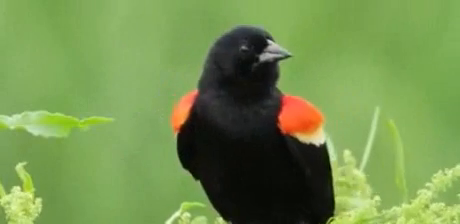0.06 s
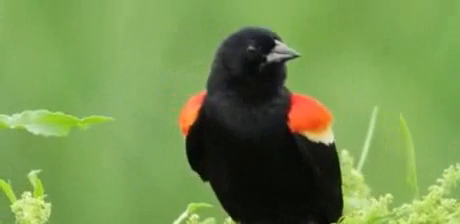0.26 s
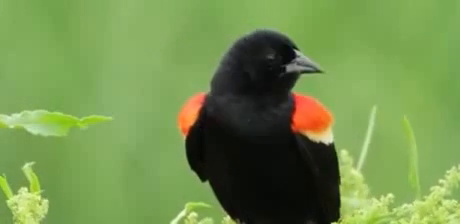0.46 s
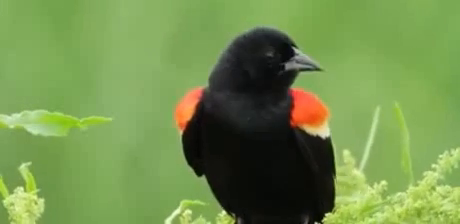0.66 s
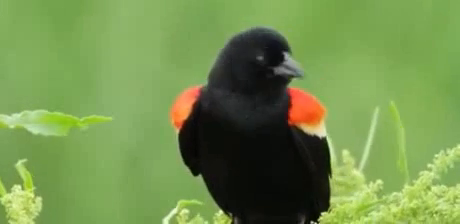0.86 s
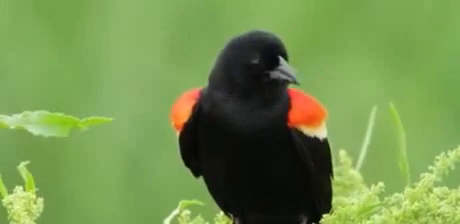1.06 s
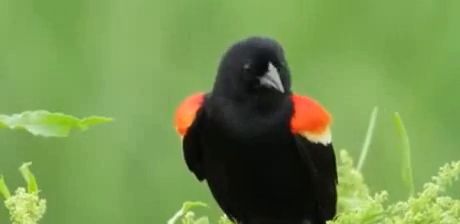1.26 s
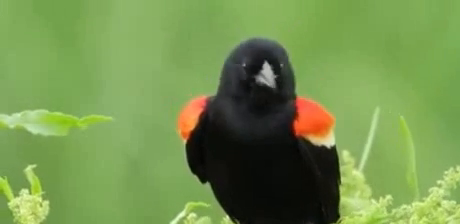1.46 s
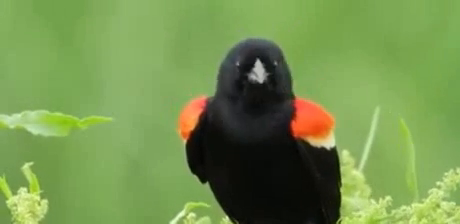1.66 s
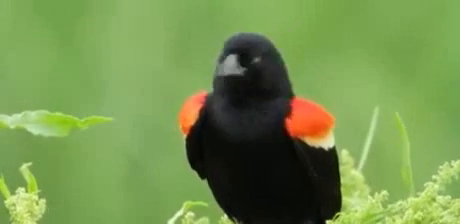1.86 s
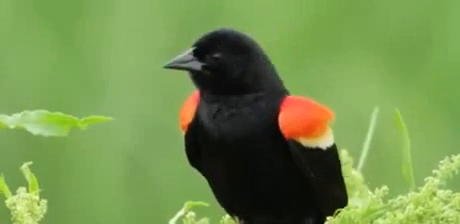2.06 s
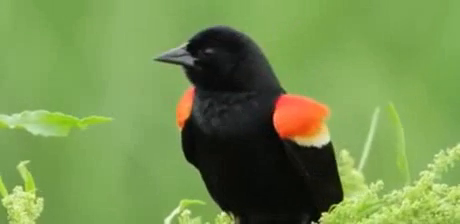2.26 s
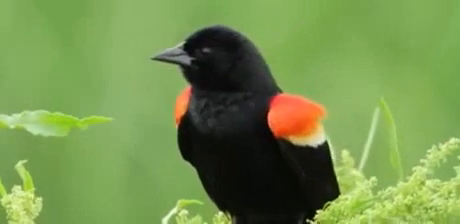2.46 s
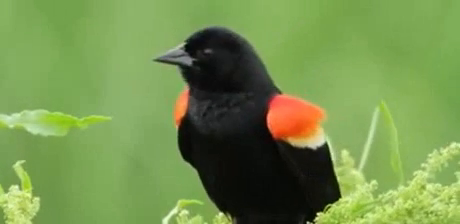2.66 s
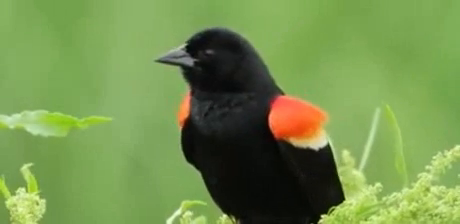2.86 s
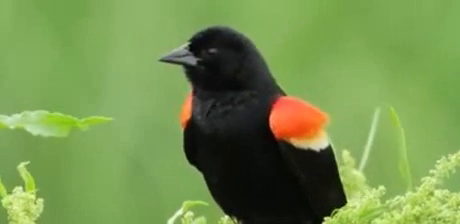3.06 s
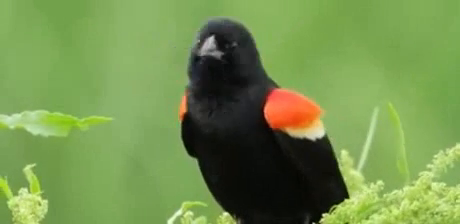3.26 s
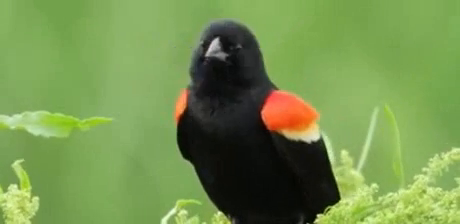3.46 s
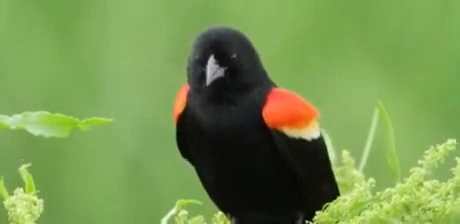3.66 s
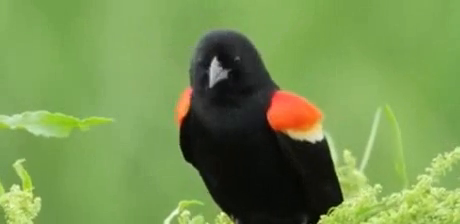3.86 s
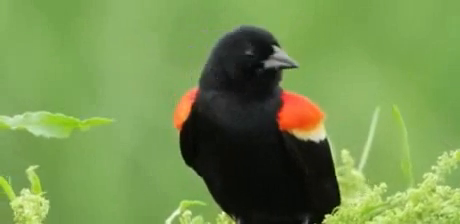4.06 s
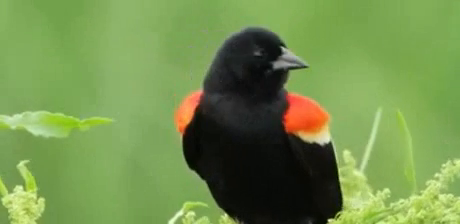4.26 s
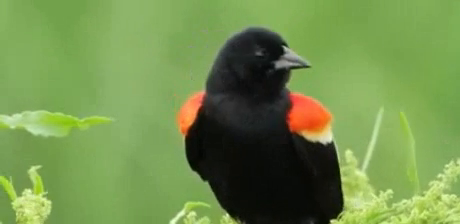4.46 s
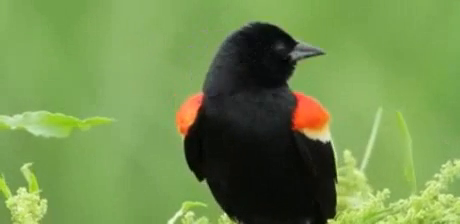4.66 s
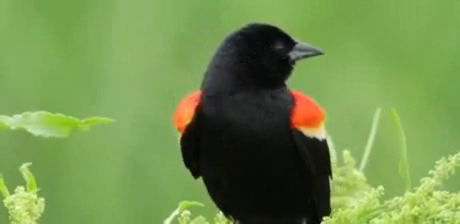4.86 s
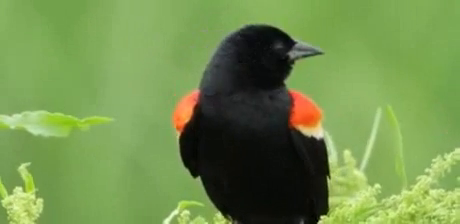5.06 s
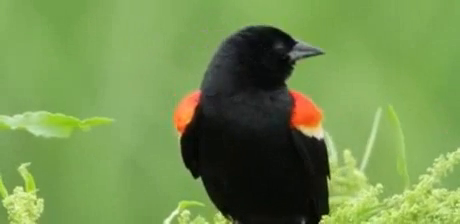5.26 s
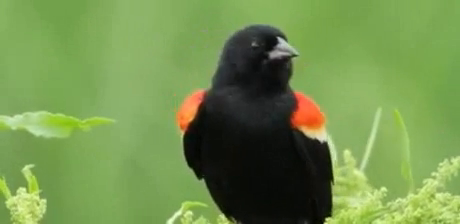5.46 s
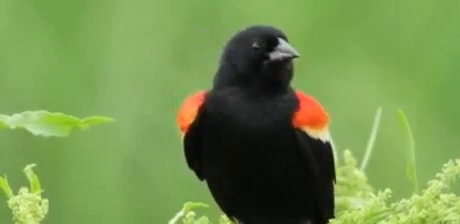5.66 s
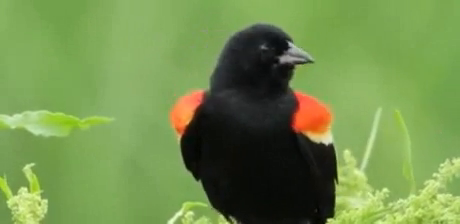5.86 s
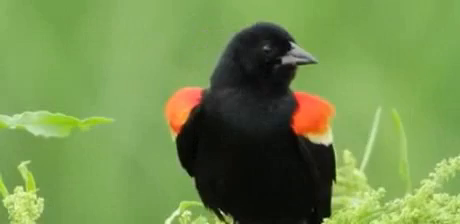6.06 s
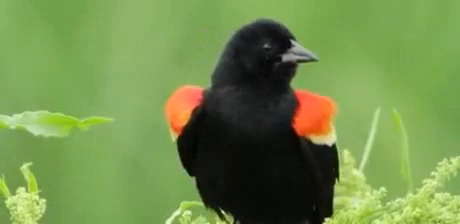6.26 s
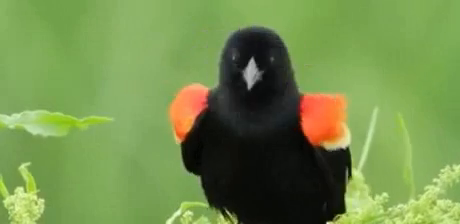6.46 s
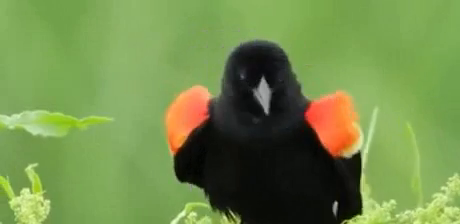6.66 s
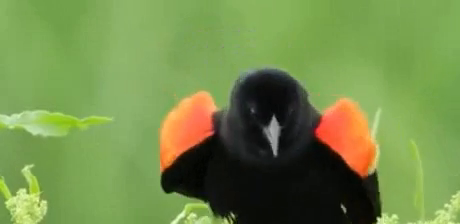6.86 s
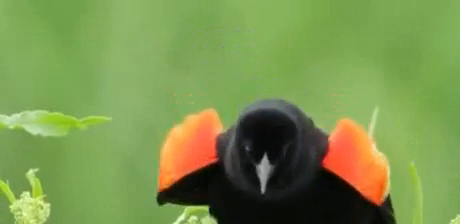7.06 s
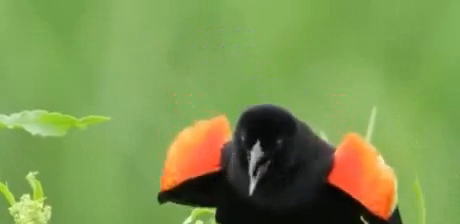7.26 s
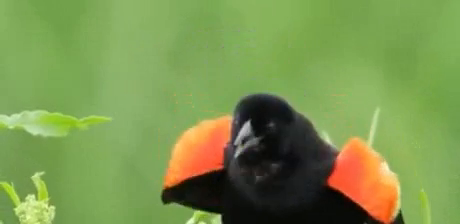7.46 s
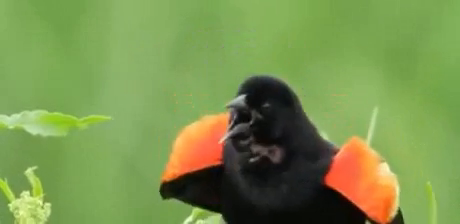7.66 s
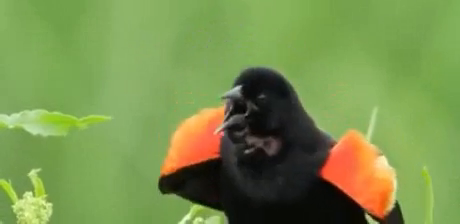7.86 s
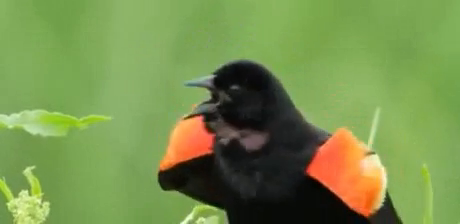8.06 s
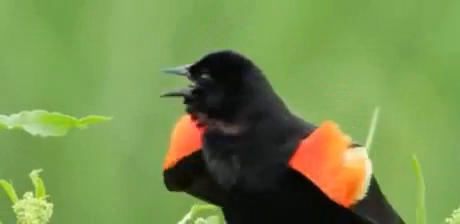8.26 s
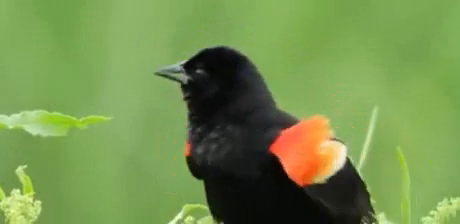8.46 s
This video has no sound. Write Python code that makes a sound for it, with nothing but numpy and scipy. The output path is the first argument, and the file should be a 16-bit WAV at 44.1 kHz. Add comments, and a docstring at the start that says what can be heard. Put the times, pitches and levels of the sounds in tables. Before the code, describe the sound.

A close red-winged blackbird gives two sharp checks, then a loud liquid, buzzy song ending in a harsh trill, over busy distant marsh birds.

```python
"""A marsh: close to the microphone a red-winged blackbird on a plant gives two sharp checks, then sings.
Its song is a few gliding liquid notes, noisy buzzes and a harsh trill of tonal syllables over pulsed rasp.
Around it other birds twitter in bent sines, rasp in shaken tones and answer with far-off notes and trills,
over a chorus of hundreds of faint notes and a low rumble of coloured noise.
The vegetation scatters a short echo and returns a later, duller one; the microphone is nearly mono."""
import sys
import numpy as np
from scipy import signal
from scipy.fft import rfft, irfft, next_fast_len
from scipy.io import wavfile
from scipy.ndimage import map_coordinates

SR = 44100
rng = np.random.default_rng(int(sys.argv[2]) if len(sys.argv) > 2 else 0)


def inscribe(sig):
    """Save sig as 16-bit PCM at rate SR to the path in sys.argv[1].

    A 1-D sig is mono; a 2-D sig holds one channel per row.
    Samples are clipped to [-1, 1] before scaling.
    """
    pcm = np.round(np.clip(np.atleast_2d(sig).T, -1, 1) * 32767)
    wavfile.write(sys.argv[1], SR, pcm.astype(np.int16))


N = 377055
TIME = np.arange(N) / SR

# Trills of the close bird, a neighbour and two far birds, each slowing as it goes.
# Each row: start in seconds, length in seconds, first and last rate in syllables per second, level in dB.
TRILL_EVENTS = [(7.8704, .685, 66.25, 61.2, -21.5), (5.6755, 0.44, 72.2, 64, -41.5),
                (6.7813, .8, 66, 60, -43.5), (4.63, 0.5, 53, 52, -60)]
# Colour of the rasp in the trills from farther off. Each row: frequency in Hz, relative level in dB.
DISTANT_RASP_COLOUR = [(1000, -45), (2200, -36), (2700, 3), (3300, 6.5), (3900, -5), (4500, -8), (5200, -4),
                       (6000, -34), (7000, -24.5), (10000, -56)]


def undb(db):
    """Decibels to gain."""
    return 10 ** (np.asarray(db) / 20)


def unit(x):
    """Scale to rms 1."""
    return x / np.sqrt(np.mean(x ** 2) + 1e-20)


def add(track, s, sound):
    """Mix a sound into a track at time s."""
    i = max(int(s * SR), 0)
    track[i:i + len(sound)] += sound[:max(len(track) - i, 0)]


def colour(x, points):
    """Filter by a spectrum of (Hz, dB) points that falls off beyond its ends; rms 1."""
    hz, db = np.transpose(points)
    size = next_fast_len(len(x))
    f = np.maximum(np.arange(size // 2 + 1) * SR / size, 1)
    gain = undb(np.interp(np.log(f), np.log(hz), db))
    gain = gain * np.minimum(f / hz[0], 1) ** 2 * np.minimum(hz[-1] / f, 1) ** 2
    return unit(irfft(rfft(x, size) * gain, size)[:len(x)])


def walk(rate, size=N):
    """Smooth random wander with spread near 1, through `rate` random points per second."""
    at = np.arange(size) * rate / SR
    return map_coordinates(rng.standard_normal(int(at[-1]) + 3), [at], order=2, mode="nearest")


def progress(length):
    """Runs from 0 to 1 during a note."""
    return np.linspace(0, 1, max(int(length * SR), 16))


def swell(u, edge):
    """Note envelope with rounded edges; rms 1."""
    return unit(np.sin(np.pi / 2 * np.clip(np.minimum(u, 1 - u) / edge, 0, 1)) ** 2)


def turn(hz):
    """Phase of a moving pitch."""
    return 2 * np.pi * np.cumsum(hz) / SR


def glide(s, length, hz, share, db):
    """A note that slides evenly through its pitch by a share of it."""
    return s, length, hz * (1 - share / 2), hz, hz * (1 + share / 2), db


def whistles(table, waver, edge, octave_db):
    """Nearly pure notes: a fundamental and octave that bend through three pitches."""
    out = np.zeros(N)
    for s, length, start, middle, end, db in table:
        u = progress(length)
        hz = np.polyval(np.polyfit([0, .5, 1], [start, middle, end], 2), u)
        phase = turn(hz * (1 + waver * walk(249, size=len(u))))
        tone = np.sin(phase) + undb(octave_db) * np.sin(2 * phase)
        add(out, s, undb(db) * swell(u, edge) * unit(tone))
    return out


def air(air_db=-56, hum_db=-64):
    """Low rumble and faint hiss from coloured noise, and a wavering far-off hum that grows."""
    # Colour of the still air. Each row: frequency in Hz, relative level in dB.
    air_colour = [(15, 0), (30, -3), (60, -8), (100, -9.5), (160, -20.5), (300, -22.5), (500, -28.5),
                  (1000, -25), (2500, -36), (6000, -40), (10000, -41.5), (14500, -44.5)]
    hum_hz = 95.3
    hum = unit(np.sin(turn(hum_hz * (1 + 0.0253 * walk(10))))) * undb(2 * walk(4.0))
    growth = np.interp(TIME, [3.5, 6], [.5, 1.2])
    return undb(air_db) * colour(rng.standard_normal(N), air_colour) + undb(hum_db) * hum * growth


def flock(count, low_hz, high_hz, length, bend, rough):
    """Hundreds of faint notes, each with its own moment, pitch and curve; together rms 1."""
    when, pitch, long = rng.random((count, 3)).T
    curve = np.exp(bend * rng.standard_normal((count, 3)))
    hz = (low_hz * (high_hz / low_hz) ** pitch)[:, None] * curve
    starts = (np.arange(count) + when) / count * N / SR
    table = np.column_stack([starts, length * (.5 + long), hz, 3 * rng.standard_normal(count)])
    return unit(whistles(table, waver=rough, edge=0.36, octave_db=-18.5))


def chorus(low_db=0, trills_db=-1, twitter_db=-1, blur_db=-10, recede_s=3.7, recede_db=-10, flicker_db=2):
    """Low notes, throbbing trills and twitter from far away, partly blurred into a noise murmur.

    Later on, single voices stand out less."""
    # Levels of the distant groups ahead of the trims.
    # Each row: time in seconds, low voices in dB, blackbird trills in dB, twitter in dB.
    group_levels = [(0.0, -46.5, -49, -49), (0.14, -59, -57.5, -53), (1.65, -56, -45.5, -47.5),
                    (2.38, -61, -48.5, -45.5), (2.95, -59, -54.5, -47.5), (3.47, -64, -57.5, -52.5),
                    (3.82, -56, -63, -67), (4.52, -77, -64.5, -64), (5.45, -65, -65.5, -67.5),
                    (6.38, -69.5, -59.5, -54.5), (6.622, -70, -53.5, -53.5), (6.76, -73, -54, -52)]
    # Colours of the three groups. Each row: frequency in Hz, relative level in dB.
    low_colour = [(400, -14.5), (600, -11.5), (1300, 1), (1800, 1.5), (2600, -22)]
    trill_colour = [(1800, -14), (2400, -10), (2780, -1), (3100, -7), (3500, -12.5), (4200, -30)]
    twitter_colour = [(2800, 6.5), (3600, 2.5), (4300, 2), (5300, 2), (6200, -12.5), (8000, -14.5),
                      (11000, -27.5)]
    s, *levels = np.transpose(group_levels)
    low = flock(count=300, low_hz=561.0, high_hz=2083.0, length=0.071, bend=0.0261, rough=0.015)
    trills = flock(count=700, low_hz=2315, high_hz=3563, length=0.035, bend=0.0397, rough=0.0269)
    trills = trills * (1 + 0.43 * np.sin(turn(64 + 5 * walk(2.6))))
    twitter = flock(count=750, low_hz=3313, high_hz=7610, length=0.043, bend=0.0394, rough=0.0362)
    groups = zip((low, trills, twitter), levels, (low_colour, trill_colour, twitter_colour),
                 (low_db, trills_db, twitter_db))
    clear = undb(recede_db * np.clip((TIME - recede_s) / .5, 0, 1))
    blur = undb(blur_db)
    out = 0
    for voices, db, shape, trim in groups:
        murmur = clear * colour(voices, shape) + blur * colour(rng.standard_normal(N), shape)
        murmur = murmur / np.hypot(clear, blur)  # keeps the level as voices give way to murmur
        out = out + murmur * undb(np.interp(TIME, s, db) + trim + flicker_db * walk(25))
    return out


def rasps(buzz_hz=290, spread=.115, sweep=0.39, chaos=0.306, throb=0.49, edge=0.14, sag=0.0595, grain=0.32):
    """Sinking tones, shaken unevenly in pitch and strength, so that each breaks into a chain of tiny chirps."""
    # Buzzy notes, most of them chained into falling flights of steps.
    # Each row: start in seconds, length in seconds, pitch in Hz, level in dB ahead of the scene's trim.
    rasp_notes = [(0, 0.029, 7270, -47), (0.075, 0.057, 5070, -53.5), (.697, 0.044, 5780, -51),
                  (0.742, 0.03, 5380, -47.5), (0.771, 0.041, 5030, -43), (.997, .025, 5860, -41),
                  (1.022, .046, 5630, -45.5), (1.066, 0.065, 4900, -41), (1.302, 0.0084, 7400, -44),
                  (1.308, .013, 6840, -35.5), (1.32, .027, 5160, -37), (1.513, 0.027, 7000, -45.5),
                  (1.538, 0.01, 6800, -35), (1.543, .035, 5310, -36.5), (1.575, 0.023, 6700, -37.5),
                  (1.717, 0.052, 7020, -40.5), (1.765, 0.045, 6380, -41.5), (1.951, 0.04, 7250, -46.5),
                  (1.984, 0.052, 6860, -41.5), (2.034, 0.031, 5920, -43.5), (2.065, 0.025, 5090, -37.5),
                  (2.136, 0.081, 6430, -45.5), (2.205, 0.024, 5200, -42.5), (2.231, 0.07, 7200, -44.5),
                  (2.295, 0.03, 6470, -41), (2.321, 0.024, 5560, -40), (2.343, 0.0258, 5010, -37),
                  (2.508, 0.026, 7420, -47.5), (2.528, 0.039, 6530, -45), (2.572, .025, 4920, -38.5),
                  (2.597, 0.0395, 5520, -41.5), (2.645, .029, 7750, -52.5), (2.72, 0.081, 6600, -55),
                  (2.79, 0.041, 7220, -45), (2.862, .062, 5250, -44.5), (3.087, 0.052, 5270, -49),
                  (3.215, 0.042, 6410, -50), (3.255, 0.057, 5210, -52.5), (3.48, 0.083, 4970, -54),
                  (3.695, 0.0405, 4400, -54.5), (4.272, .075, 5860, -63.5), (5.525, .022, 3900, -57),
                  (5.641, 0.033, 4150, -48), (6.317, 0.024, 4090, -51), (7.047, 0.1, 3470, -55),
                  (7.202, 0.049, 4950, -57), (7.885, 0.029, 3690, -28), (8.26, 0.043, 3930, -34)]
    out = np.zeros(N)
    for s, length, centre, db in rasp_notes:
        u = progress(length)
        width = spread * centre
        wander = 0.214 * rng.standard_normal() + 0.249 * walk(200, size=len(u))
        shake = turn(buzz_hz * np.exp(wander))
        shift = sweep * np.sin(shake) + chaos * walk(width, size=len(u))
        hz = centre * (1 - sag * (u - .5)) + width * shift
        strength = 1 + throb * np.cos(shake) + grain * walk(width, size=len(u))
        add(out, s, undb(db) * unit(strength * np.sin(turn(hz))) * swell(u, edge))
    return out


def neighbour_whistles():
    """Plain whistles of other neighbours: nearly pure tones that slide evenly."""
    # Each row: start in seconds, length in seconds, pitch in Hz, glide as a share of the pitch, level in dB.
    whistle_notes = [(0.033, 0.11, 4020, 0.014, -56.5), (1.332, 0.086, 1878, -0.14, -46),
                     (1.338, 0.068, 6030, -0.013, -41.5), (1.621, 0.17, 3225, -0.022, -50.5),
                     (1.667, 0.08, 8130, -0.028, -51.5), (1.832, 0.037, 3410, 0.11, -46),
                     (2.986, 0.082, 1277, -0.069, -58.5), (3.165, 0.053, 1417, 0.055, -55),
                     (3.511, 0.098, 3974, 0.0074, -45), (4.101, 0.034, 1240, 0.23, -55),
                     (4.524, 0.076, 2455, 0.047, -61.5), (5.133, 0.072, 1308, -0.099, -65),
                     (5.283, .055, 1313, 0.12, -59.5), (5.827, 0.088, 1622, 0.0093, -60),
                     (6.051, 0.096, 1560, -0.02, -49.5), (6.49, 0.06, 2062, 0.087, -51),
                     (6.68, 0.04, 2467, 0.00016, -50.5), (6.854, 0.071, 1885, -0.07, -47.5),
                     (7.01, .02, 2050, 0.61, -53), (7.173, 0.041, 2473, 0.076, -49),
                     (7.549, 0.063, 1900, 0.089, -47.5)]
    return whistles([glide(*row) for row in whistle_notes], waver=0.0077, edge=0.12, octave_db=-37.0)


def burst(length, hz, drop, rough, scrape_db, edge):
    """A burst of a few milliseconds: the pitch snaps down, with a little broad scrape."""
    u = progress(length)
    jitter = walk(1556, size=len(u))
    fall = drop * (np.exp(-3 * u) - .35)
    tone = np.sin(turn(hz * (1 + fall + rough * (jitter - jitter.mean()))))
    scrape = colour(rng.standard_normal(len(u)), [(1400, -10), (2900, 2.0), (5500, -12.0), (12000, -37.5)])
    return swell(u, edge) * (unit(tone) + undb(scrape_db) * scrape)


def checks(lead_s=.005, lead_length=0.0047, lead_pitch=0.97, lead_db=-6.0):
    """Each check is a double burst: a short, lower one just ahead of the main one."""
    # Check calls, near and far, all of one shape. Each row: time in seconds, level in dB.
    check_calls = [(.141, -22.5), (.374, -46.5), (1.101, -38.5), (2.561, -38.5), (3.307, -42.5),
                   (3.41, -42), (3.528, -22), (4.347, -48), (4.861, -46.5), (6.437, -45), (6.636, -39)]
    main_hz, main_length = 2759, 0.0075
    parts = ((lead_s, lead_length, main_hz * lead_pitch, lead_db), (0, main_length, main_hz, 0))
    out = np.zeros(N)
    for s, db in check_calls:
        for early, length, hz, trim in parts:
            sound = burst(length, hz, drop=0.18, rough=0.048, scrape_db=-15.5, edge=0.3)
            add(out, s - early, undb(db + trim) * sound)
    return out


def low_notes(waver=0.013, flutter_db=2.5):
    """Hollow distant notes: a fundamental and its octave, fluttering in level."""
    # Far-off low song notes. Each row: start in seconds, length in seconds, pitch in Hz,
    # fundamental in dB, octave in dB, both ahead of the scene's trim.
    hollow_notes = [(0.311, 0.077, 683, -81, -60.5), (0.351, 0.04, 521, -71, -59.5),
                    (0.425, 0.13, 692, -66, -60), (0.529, 0.23, 528.3, -80, -54.5),
                    (1.969, 0.29, 711, -68, -65), (2.178, 0.057, 642, -61.5, -60),
                    (2.317, .14, 869.3, -58, -60), (2.662, 0.233, 708.6, -69, -57),
                    (3.059, 0.13, 687.5, -70.5, -62), (3.35, 0.085, 851, -63.5, -66.5),
                    (3.53, 0.082, 520, -66.5, -73), (3.559, 0.097, 693, -65.5, -73),
                    (3.641, 0.15, 544.4, -62.5, -65.5), (3.74, 0.079, 853, -62.5, -65),
                    (3.826, 0.113, 543, -62, -59), (4.52, 0.074, 869, -68.5, -74),
                    (4.121, 0.062, 860.5, -67, -62.5), (6.696, 0.054, 560.4, -89, -58),
                    (6.918, 0.058, 874, -62, -79), (7.309, 0.054, 672, -57.5, -51),
                    (7.385, 0.18, 549, -68.5, -65)]
    out = np.zeros(N)
    for s, length, hz, first_db, octave_db in hollow_notes:
        u = progress(length)
        phase = turn(hz * (1 + waver * walk(61.2, size=len(u))))
        tone = undb(first_db) * np.sin(phase) + undb(octave_db) * np.sin(2 * phase)
        flutter = undb(flutter_db * walk(58.0, size=len(u)))
        add(out, s, np.sqrt(2) * tone * swell(u, 0.075) * flutter)
    return out


def slurs(table, shape):
    """Clear notes that all bend in the same way about their middle pitch."""
    rows = [(s, length, *(hz * np.array(shape)), db) for s, length, hz, db in table]
    return whistles(rows, waver=0.0095, edge=0.24, octave_db=-31)


def twittering_neighbour():
    """Upward and downward slurs: bent, nearly pure tones."""
    # Each row of both: start in seconds, length in seconds, middle pitch in Hz, level in dB.
    upward = [(.667, 0.036, 3820, -49), (.742, 0.063, 3870, -51), (.955, 0.058, 3920, -41.5),
              (1.135, 0.047, 3740, -59), (2.465, 0.041, 4150, -50), (2.558, 0.032, 4100, -43),
              (2.682, .028, 3600, -45.5), (2.835, 0.05, 4430, -40.5), (2.985, 0.072, 3650, -53.5),
              (3.09, 0.056, 3900, -53), (3.39, 0.095, 3570, -51.5), (4.68, .11, 3220, -59)]
    downward = [(.88, 0.034, 3870, -55), (.917, 0.044, 3340, -48), (1.235, 0.056, 3740, -41.5),
                (1.47, 0.052, 3730, -47.5), (1.68, 0.052, 4280, -40.5), (2.075, 0.054, 4400, -47),
                (2.39, 0.04, 3800, -53), (2.65, 0.079, 3680, -50), (2.912, 0.052, 3810, -46.5),
                (3.1, .04, 3750, -47.5), (3.273, 0.066, 4010, -49), (3.476, 0.052, 4170, -45),
                (3.718, .03, 3760, -52.5)]
    # pitch at start, middle and end, as a multiple of the middle pitch
    return slurs(upward, (.88, 0.98, 1.2)) + slurs(downward, (1.13, 0.99, 0.935))


def trill(event, rasp_colour, late, rise_db, rise_s, fade_db, fade_s, length, high_hz, low_hz, tone_db,
          harsh_db, alike, pulsing, tone_from_s, rattle, rattle_hz=345, scatter_db=1.0, scatter_pitch=0.0082,
          scatter_s=.0003, attack_s=0.0068):
    """A rasp, partly alike from cycle to cycle, runs under falling tonal syllables.

    These rattle at first and settle on a clear low tone. The larger `late`, the later the trill slows.
    It starts `rise_db` softer (louder if negative) and loses `fade_db` towards its end."""
    s, span, first_rate, last_rate, db = event
    t = np.arange(int(span * SR)) / SR
    rate = first_rate + (last_rate - first_rate) * (t / span) ** late
    cycle = np.cumsum(rate) / SR
    level = db - rise_db * np.exp(-t / rise_s) - fade_db * np.clip(1 - (span - t) / fade_s, 0, 1)
    u = progress(length)
    rattling = 1 - rattle * (1 - u) * np.cos(2 * np.pi * rattle_hz * length * u)
    syllable = swell(u ** 1.32, 0.38) * rattling
    beat = np.arange(int(SR / rate.mean())) / SR
    # one cycle of rasp noise, repeated
    pattern = rng.standard_normal(len(beat)) * (1 + 0.62 * np.sin(2 * np.pi * rattle_hz * beat))
    tone, rasp = np.zeros(len(t)), np.zeros(len(t))
    for centre in np.interp(np.arange(cycle[-1]), cycle, t):
        centre = centre + scatter_s * rng.standard_normal()
        hz = low_hz + (high_hz - low_hz) * (1 - u) ** 2.88
        hz = hz * (1 + scatter_pitch * rng.standard_normal())
        voice = np.sin(turn(hz * (1 + 0.011 * walk(710, size=len(u)))))
        add(tone, centre - length / 2, voice * syllable * undb(scatter_db * rng.standard_normal()))
        add(rasp, centre, pattern)
    alike = np.clip(alike, 0, 1)
    rasp = np.sqrt(alike) * rasp + np.sqrt(1 - alike) * rng.standard_normal(len(t))
    rasp = colour(rasp * (1 + pulsing * np.cos(2 * np.pi * cycle + 1.02)), rasp_colour)
    tone_entry = np.clip((t - tone_from_s) / attack_s, 0, 1)
    song = undb(tone_db) * unit(tone) * tone_entry + undb(harsh_db) * rasp
    out = np.zeros(N)
    add(out, s, song * undb(level) * np.clip(np.minimum(t, span - t) / attack_s, 0, 1))
    return out


def far_trills():
    """Two far birds: mostly clear syllables over a faint rasp, swelling and fading."""
    out = np.zeros(N)
    for event in TRILL_EVENTS[2:]:
        out += trill(event, DISTANT_RASP_COLOUR, late=0.99, rise_db=3.5, rise_s=0.36, fade_db=15.5,
                     fade_s=0.24, length=0.02, high_hz=3156, low_hz=2724, tone_db=1.5, harsh_db=-21.5,
                     alike=0.2, pulsing=0.17, tone_from_s=0.0063, rattle=.1)
    return out


def rival_opening():
    """A neighbour's notes ahead of its trill: nearly pure tones that slide upward."""
    # Each row: start in seconds, length in seconds, pitch in Hz, glide as a share of the pitch, level in dB.
    rival_notes = [(5.479, 0.023, 1846, 0.16, -57), (5.521, 0.03, 3330, 0.045, -42.5),
                   (5.552, 0.073, 2517, 0.049, -39), (5.553, 0.065, 2166, 0.052, -48),
                   (5.652, 0.015, 3364, .01, -32.5)]
    return whistles([glide(*row) for row in rival_notes], waver=0.01, edge=0.37, octave_db=-35)


def rival_trill():
    """The neighbour's trill: falling syllables with a strong rasp."""
    return trill(TRILL_EVENTS[1], DISTANT_RASP_COLOUR, late=0.93, rise_db=-1, rise_s=0.027, fade_db=3.0,
                 fade_s=0.089, length=0.011, high_hz=3080, low_hz=2630, tone_db=-1.5, harsh_db=-3.5,
                 alike=0.45, pulsing=0.22, tone_from_s=0.0038, rattle=0.15)


def hiss(grain=0.28):
    """A drawn-out call of broad, grainy noise: it swells fast, holds, then fades."""
    # Colour of the call. Each row: frequency in Hz, relative level in dB.
    hiss_spectrum = [(530, -65), (900, -31), (1510, -6.5), (2080, -10.5), (2650, -2), (2970, -11.5),
                     (4290, -3), (4700, -13), (5340, -4), (7030, -10.5), (11000, -25.5), (14000, -47)]
    start_s, length_s, peak_db = 5.975, 0.39, -38
    attack_s, hold_s, fade_db_per_s, release_s = 0.04, 0.069, 43, 0.15  # hold counts from the start
    t = TIME - start_s
    attack = np.clip(t / attack_s, 0, 1)
    fade = undb(peak_db - fade_db_per_s * np.maximum(t - hold_s, 0))
    release = np.clip((length_s - t) / release_s, 0, 1)
    noise = rng.standard_normal(N) * (1 + grain * walk(500))
    return colour(noise, hiss_spectrum) * attack * fade * release


def lead_in(rise=0.014, lateness=1.62, edge=0.23):
    """A pure low whistle that swells slowly, rising a little, and stops short."""
    # Each row: start in seconds, length in seconds, pitch in Hz, level in dB.
    lead_note = [(7.434, 0.13, 1176, -31)]
    s, length, hz, db = lead_note[0]
    u = progress(length)
    tone = np.sin(turn(hz * (1 + rise * (u - .5))))
    out = np.zeros(N)
    add(out, s, undb(db) * unit(tone) * swell(u ** lateness, edge))
    return out


def opening_notes():
    """The close bird's liquid notes: nearly pure tones, each rising a little."""
    # Each row: start in seconds, length in seconds, pitch in Hz, level in dB.
    liquid_notes = [(7.595, .014, 2380, -32), (7.609, 0.0083, 2372, -21.5), (7.614, 0.019, 2503, -31.5),
                    (7.625, 0.053, 9850, -45.5), (7.704, .02, 1800, -41.5), (7.719, .016, 1735, -30),
                    (7.838, 0.046, 2408, -34.5)]
    rows = [glide(s, length, hz, 0.032, db) for s, length, hz, db in liquid_notes]
    return whistles(rows, waver=0.014, edge=0.31, octave_db=-29.5)


def buzz(flutter_hz=640, throb_hz=270, throb=.55, scrape_db=-22):
    """High notes shaken so fast that they split into three bands; they throb unevenly and scrape a little."""
    # Each row: start in seconds, length in seconds, pitch in Hz, shake as a share of the pitch,
    # level in dB ahead of the throb.
    buzz_notes = [(7.638, .015, 4960, 0.017, -28.5), (7.66, .024, 5310, .07, -27)]
    out = np.zeros(N)
    for s, length, hz, depth, db in buzz_notes:
        u = progress(length)
        shake = np.sin(turn(flutter_hz * (1 + 0.1 * walk(340, size=len(u)))))
        tone = np.sin(turn(hz * (1 + depth * shake + .011 * walk(900, size=len(u)))))
        scrape = colour(rng.standard_normal(len(u)), [(4500, -19), (6500, -4), (10000, -4), (13500, -15)])
        beat = np.sin(turn(throb_hz * (1 + 0.36 * walk(throb_hz, size=len(u)))))
        note = (unit(tone) + undb(scrape_db) * scrape) * swell(u, .17)
        add(out, s, undb(db) * note * (1 + throb * beat))
    return out


def stutter(count=5, rise=0.082, sag_curve=1.78, steady_lead_s=.035, steady_s=0.172, steady_db=-5):
    """A run of short rising notes that slows and sinks, with thin high partials.

    Steady high tones sound from just before the run until after it."""
    # Partials that sound with each note. Each row: frequency in Hz, level in dB against the note.
    high_partials = [(5830, -23.5), (8600, -33)]
    start_s, gap_s, slowing_s, note_s = 7.7335, .0158, .0015, 0.016
    first_hz, sag_hz, note_db = 1693, 11.4, -22.5
    k = np.arange(count)
    times = start_s + k * gap_s + k * (k - 1) / 2 * slowing_s
    pitches = first_hz - sag_hz * k ** sag_curve
    notes = [glide(s, note_s, hz, rise, note_db) for s, hz in zip(times, pitches)]
    partials = [glide(s, note_s, hz, -rise / 4, note_db + db) for s in times for hz, db in high_partials]
    partials += [glide(start_s - steady_lead_s, steady_s, hz, 0, note_db + db + steady_db)
                 for hz, db in high_partials]
    run = whistles(notes, waver=0.0028, edge=0.26, octave_db=-47)
    return run + whistles(partials, waver=0.019, edge=0.16, octave_db=-32)


def snap():
    """The loud snap that launches the close trill: one burst whose pitch drops steeply."""
    # Each row: start in seconds, length in seconds, pitch in Hz, level in dB.
    snap_note = [(7.9108, 0.0082, 2896, -11.5)]
    s, length, hz, db = snap_note[0]
    out = np.zeros(N)
    add(out, s, undb(db) * burst(length, hz, drop=0.3, rough=0.022, scrape_db=-22.5, edge=0.3))
    return out


def close_trill(surge_s=8.45, surge_width_s=0.022, surge_db=3):
    """The close bird's harsh trill, whose treble and lows vary in level; it surges once near the end."""
    # Colour of the rasp. Each row: frequency in Hz, relative level in dB.
    near_rasp_colour = [(700, -55), (1700, -17.5), (2350, -18.5), (2750, -4), (3170, 3), (4550, -12.5),
                        (5400, -2.5), (5870, -8), (6150, -50), (6900, -20.5), (8200, -33), (8700, -64),
                        (10000, -28), (12300, -54.5), (13100, -24.5), (13800, -51.5)]
    # Gains of the treble and of the lows. Each row of both: time in seconds, gain in dB.
    treble_gain = [(7.875, 7), (7.905, 1.5), (7.955, -6), (8.02, 2), (8.12, 2.5), (8.16, -0.5), (8.39, 0),
                   (8.45, 2.5), (8.495, 2.5), (8.52, -3.5)]
    lows_gain = [(8.09, -1), (8.13, 4), (8.25, 1.5), (8.285, 8), (8.33, -3.5), (8.43, -1.5), (8.47, 4),
                 (8.53, 1)]
    treble_hz, lows_hz = 4540, 2200
    song = trill(TRILL_EVENTS[0], near_rasp_colour, late=3.2, rise_db=10.0, rise_s=0.18, fade_db=4.0,
                 fade_s=0.37, length=.0128, high_hz=3287, low_hz=2767, tone_db=0.5, harsh_db=-1.46,
                 alike=0.62, pulsing=0.25, tone_from_s=0.077, rattle=0.2)
    treble = signal.sosfiltfilt(signal.butter(4, treble_hz, "high", fs=SR, output="sos"), song)
    song = song + treble * (undb(np.interp(TIME, *np.transpose(treble_gain))) - 1)
    lows = signal.sosfiltfilt(signal.butter(8, lows_hz, fs=SR, output="sos"), song)
    song = song + lows * (undb(np.interp(TIME, *np.transpose(lows_gain))) - 1)
    return song * undb(surge_db * np.exp(-((TIME - surge_s) / surge_width_s) ** 2))


def second_voice(start_s=8.15, length=0.11, start_hz=5450, fall=0.077, level_db=-30):
    """A second, higher voice within the close trill: a wavering tone that briefly slides down."""
    u = progress(length)
    tone = np.sin(turn(start_hz * (1 - fall * u + 0.014 * walk(900, size=len(u)))))
    out = np.zeros(N)
    add(out, start_s, undb(level_db) * unit(tone) * swell(u, 0.19))
    return out


def close_bird():
    """The close song: liquid notes, two buzzes, a stutter and a snap, then the trill with its second voice."""
    notes = lead_in() + opening_notes() + buzz() + stutter() + snap()
    return notes + close_trill() + second_voice()


def far_echo(x, delay_s=0.0925, smear_s=.008, echo_db=-10):
    """A distant wall of vegetation returns the sound late, dull and blurred."""
    t = np.arange(SR // 4) / SR
    scatter = colour(rng.standard_normal(len(t)), [(1100, -9), (1700, 2.5), (3500, -17)])
    scatter = scatter * np.exp(-.5 * ((t - delay_s) / smear_s) ** 2)
    strongest = np.abs(rfft(scatter)).max()
    return undb(echo_db) * signal.fftconvolve(x, scatter / strongest)[:N]


def marsh(x, wet_db, t60, side_db):
    """Stems and leaves scatter a short, duller echo that differs a little between left and right."""
    t = np.arange(SR // 2) / SR
    out = np.array([x, x])
    for ears, db in (([1, 1], wet_db), ([1, -1], wet_db + side_db)):
        tail = colour(rng.standard_normal(len(t)), [(200, 0), (3000, 0), (7000, -4), (14000, -10)])
        tail = tail * undb(-60 * t / t60) * (t > .004)
        echo = signal.fftconvolve(x, tail / np.linalg.norm(tail))[:N]
        out = out + np.outer(ears, undb(db) * echo)
    return out


def stereo_width():
    """Very faint noise of opposite sign in the two channels."""
    points = [(30, -17.0), (250, -6.0), (1000, -8.5), (8000, -30.0)]
    return np.outer([1, -1], undb(-76.5) * colour(rng.standard_normal(N), points))


def scene():
    """The close bird, its neighbours, the far birds and the air."""
    close = close_bird() + checks()
    close = close + far_echo(close)
    rivals = rival_trill() + far_trills()
    neighbours = neighbour_whistles() + undb(1.94) * rasps() + hiss() + rival_opening()
    far = undb(3.5) * low_notes() + undb(-2.0) * chorus()
    # blackbirds sing from open perches, so little echo joins them; the twitter is as dry
    birds = marsh(close + rivals + twittering_neighbour(), wet_db=-15.0, t60=0.27, side_db=-25.0)
    birds = birds + marsh(neighbours, wet_db=-7.5, t60=0.37, side_db=-18.0)
    birds = birds + marsh(far, wet_db=-8.0, t60=0.54, side_db=-3.5)
    return birds + air() + stereo_width()


def record(dry):
    """The recorder cuts the top with a steep low-pass."""
    top_hz = 14800
    return signal.sosfilt(signal.ellip(10, .1, 80, top_hz, fs=SR, output="sos"), dry)


dry = scene()
out = record(dry)
inscribe(out)
```